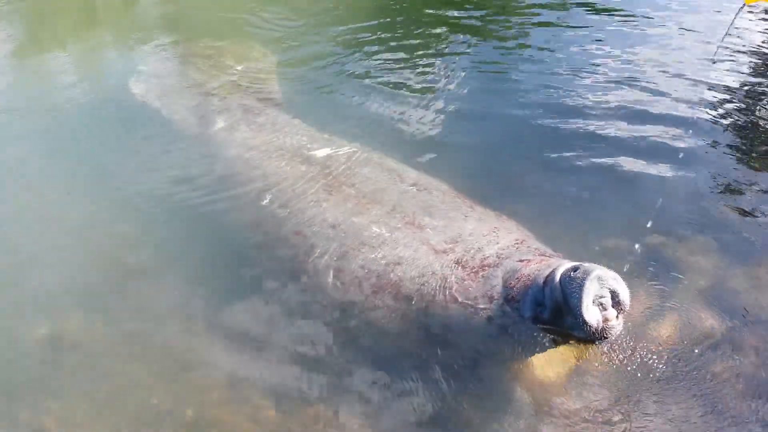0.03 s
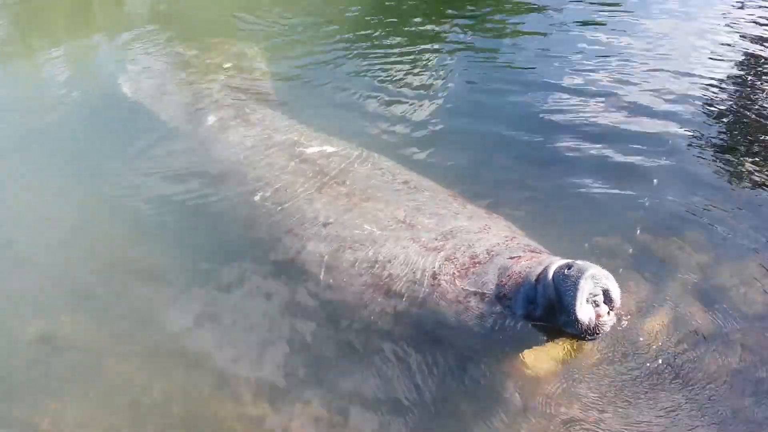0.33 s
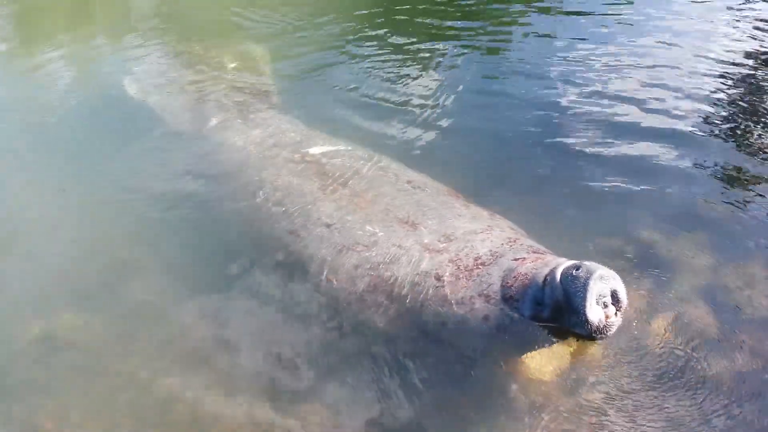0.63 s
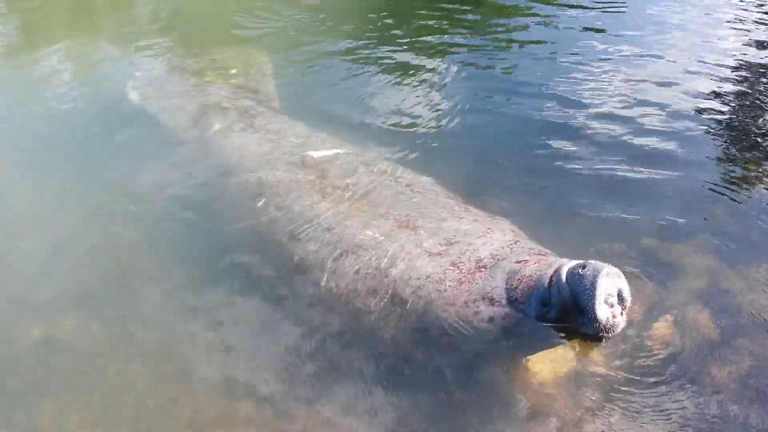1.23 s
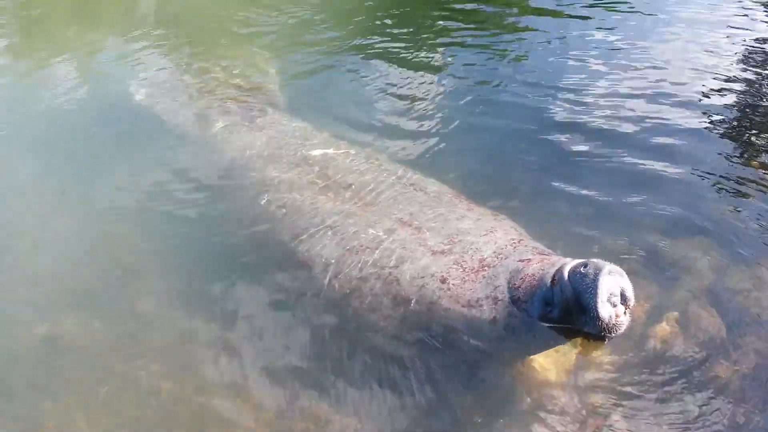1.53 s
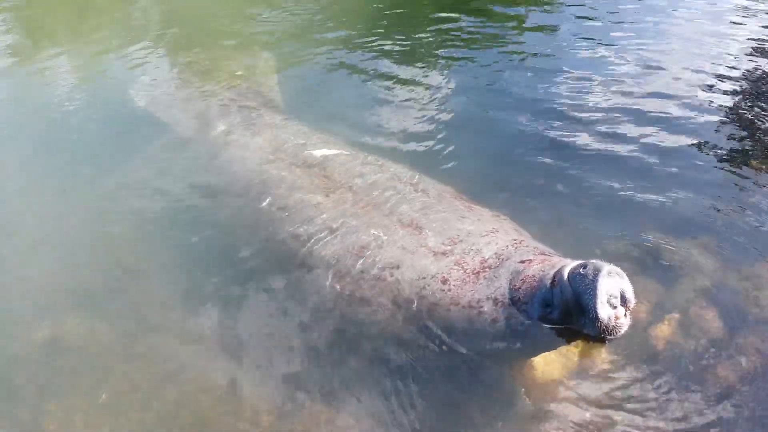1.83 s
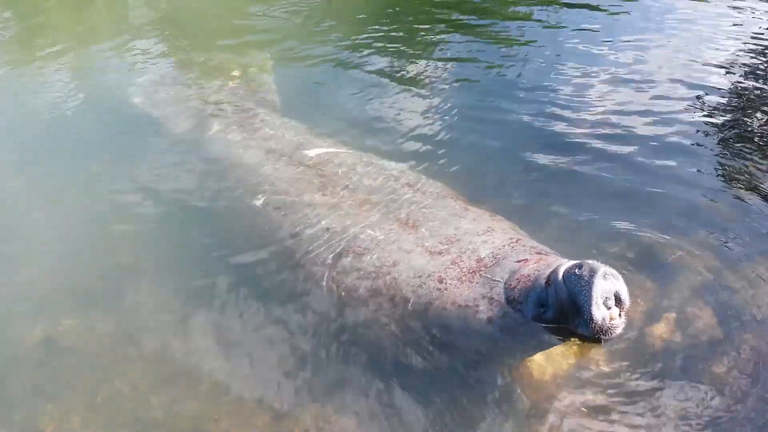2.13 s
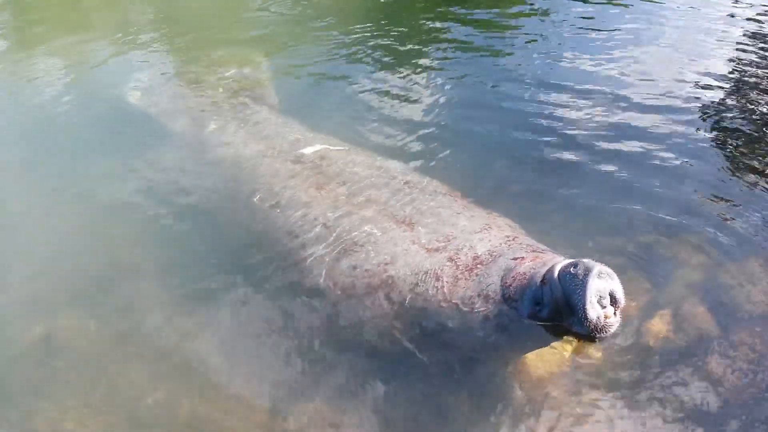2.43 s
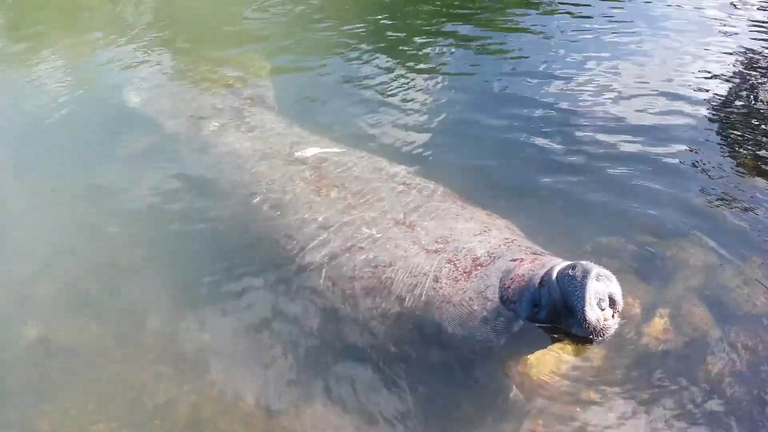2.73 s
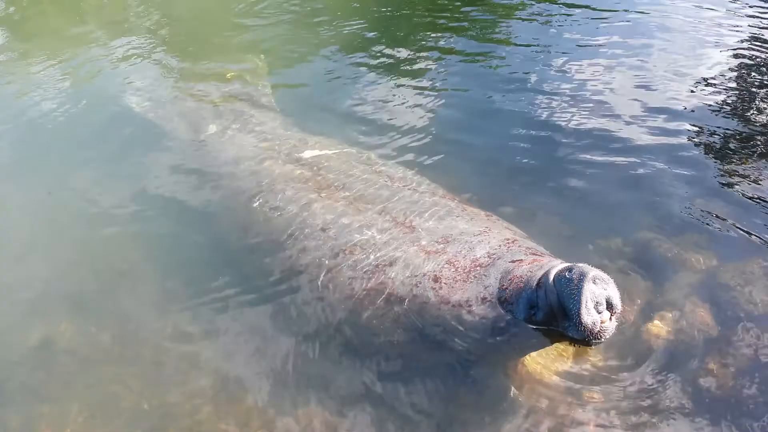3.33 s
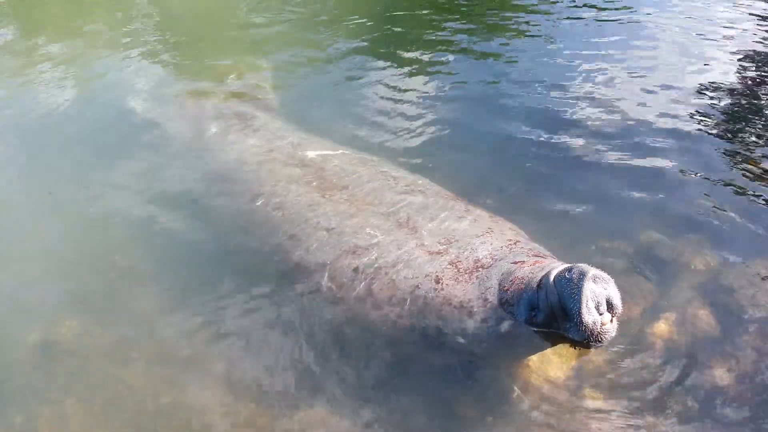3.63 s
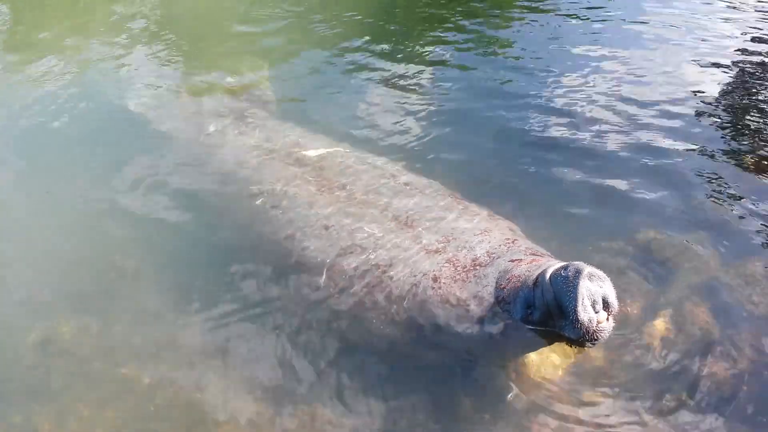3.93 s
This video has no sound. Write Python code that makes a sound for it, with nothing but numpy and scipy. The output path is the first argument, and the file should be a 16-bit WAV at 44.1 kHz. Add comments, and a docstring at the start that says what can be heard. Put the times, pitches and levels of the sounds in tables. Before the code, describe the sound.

Water drops sprinkle briefly onto calm water over a steady rumble of distant traffic.

```python
"""A thin sprinkle of water falls on a calm shallow inlet and stops after half a second.
Each drop ticks on the surface and traps a tiny ringing bubble; the stirred water laps, the bank
scatters the sound, and two stray drops follow. Far traffic rumbles throughout, with tyre roar, an
idling hum and one rising engine note, under faint hiss, a high whine and light wind."""
import sys
import numpy as np
from scipy import signal
from scipy.fft import rfft, irfft
from scipy.io import wavfile

SR = 44100
rng = np.random.default_rng(int(sys.argv[2]) if len(sys.argv) > 2 else 0)


def file_out(sig):
    """Save sig as 16-bit WAV at sys.argv[1]."""
    # one column per channel
    cols = np.atleast_2d(sig).T
    # limit, then scale
    lim = np.clip(cols, -1, 1)
    pcm = np.round(lim * 32767).astype(np.int16)
    wavfile.write(sys.argv[1], SR, pcm)


N = 176400
T = np.arange(N) / SR


def from_db(db):
    """Decibels to gain."""
    return 10 ** (np.asarray(db) / 20)


def rms_one(x):
    """Scale to unit power."""
    return x / np.sqrt(np.mean(x ** 2) + 1e-20)


def in_time(rows):
    """Each column of a time curve at every sample, end values held."""
    times_s, *columns = np.transpose(rows)
    return [np.interp(T, times_s, column) for column in columns]


def at_hz(points, hz):
    """Read a curve on a log-frequency axis."""
    points_hz, values = np.transpose(points)
    return np.interp(np.log(np.maximum(hz, 1)), np.log(np.maximum(points_hz, 1)), values)


def pan(db):
    """Stereo gains for a level difference, left minus right."""
    gains = from_db(np.array([[.5], [-.5]]) * db)
    return gains / np.sqrt(np.mean(gains ** 2, axis=0))


def drift(rate_hz):
    """Slow random motion, rms 1."""
    pole = np.exp(-80 * np.pi * rate_hz / SR)
    noise = rng.standard_normal(N // 40 + 2002)   # one value per 40 samples
    slow = signal.lfilter([1], [1, -2 * pole, pole * pole], noise)[2000:]
    return np.interp(np.arange(N) / 40, np.arange(len(slow)), rms_one(slow))


def colour(x, spectrum):
    """Filter by a smooth spectrum."""
    return irfft(rfft(x) * from_db(at_hz(spectrum, np.fft.rfftfreq(N, 1 / SR))), N)


def tone(hz):
    """Sine of rms 1 along a pitch curve."""
    return np.sqrt(2) * np.sin(2 * np.pi * np.cumsum(hz) / SR)


# Outdoor left-right likeness: f/Hz, correlation before clipping
AIR_LIKENESS = [(30, 5), (80, 2), (150, 1.5), (300, 0.7), (600, 0.83), (1000, .5), (1600, 0.24),
                (3000, 0.24), (6000, -0.08), (14000, 0)]
# Outdoor balance: f/Hz, left minus right/dB
AIR_PAN = [(60, -2), (130, -2), (290, -2), (640, -2.5), (1410, 0), (3100, 6), (6820, 0), (15000, -0.5)]
LEFT_LEAD_S = .00022


def diffuse_noise(spectrum, swell_db):
    """Outdoor stereo noise, rms 1, reaching the left first; each octave swells on its own."""
    hz = np.fft.rfftfreq(N, 1 / SR)
    mid, side = rfft(rng.standard_normal((2, N)))
    correlation = np.clip(at_hz(AIR_LIKENESS, hz), -.99, .99)
    stereo = np.sqrt(1 + correlation) * mid + np.sqrt(1 - correlation) * side * [[1], [-1]]
    stereo *= pan(at_hz(AIR_PAN, hz)) * from_db(at_hz(spectrum, hz))
    stereo[1] *= np.exp(-2j * np.pi * hz * LEFT_LEAD_S)
    octave = np.floor(np.log2(np.maximum(hz, 1)))
    bands = (irfft(stereo * (octave == k), N) for k in range(4, 15))
    return rms_one(sum(band * from_db(swell_db * drift(4.3)) for band in bands))


# Drop impacts: t/s, tick level/dB, bubble f/Hz, bubble level/dB, decay time/cycles
DROP_IMPACTS = [(.002, -26.5, 12000, -35, 5.9), (0.03, -32, 6400, -45, 3), (.076, -38, 11000, -44, 4),
                (0.096, -31, 8000, -40, 2.7), (0.0962, -25.5, 11200, -27.5, 5.3),
                (.109, -34, 13000, -36, 8), (.115, -41, 5040, -41, 5), (0.153, -43, 4180, -42, 4),
                (.157, -33, 9000, -47, 4), (0.1623, -30, 3350, -27, 3.6), (0.177, -26, 4220, -26, 3.6),
                (0.1789, -40, 2770, -31.5, 2.8), (0.199, -28, 4700, -35, 2.8), (0.209, -39, 3550, -36, 3.5),
                (.2088, -37, 12300, -39, 6), (.209, -35, 4800, -32, 3.9), (.2346, -44, 3470, -39, 2.3),
                (.266, -50, 3660, -44, 3), (.2886, -56, 4550, -39, 7.3), (0.2919, -33, 4350, -27.5, 3.5),
                (.3122, -33, 12030, -38, 9), (0.3156, -39, 5520, -32.5, 4.7), (.336, -34, 3200, -26, 0.77),
                (.3807, -34, 12900, -35, 4.4), (.4046, -29.5, 8200, -38, 3), (.4049, -37, 10800, -30, 7),
                (0.417, -28, 8140, -33, 3), (.4165, -27, 12300, -29, 4.6), (0.4197, -40, 4420, -36.5, 7.4),
                (.4494, -30, 6800, -36, 2.5), (.4495, -43, 4200, -35, 2.5), (.46, -30, 10540, -32, 3.5),
                (0.4605, -30, 4260, -37, 3.3), (.4745, -28, 12800, -38, 4), (0.477, -41, 3620, -44, 5),
                (.4955, -42, 12800, -43, 4), (1.2018, -37, 8300, -41, 2.7), (1.3767, -54, 3460, -34, 3.3),
                (1.377, -54, 1940, -44, 2.5)]
# Bubble balance: f/Hz, left minus right/dB
BUBBLE_BALANCE = [(2700, 28), (4500, 30), (7000, 18), (11000, -16), (14000, -5)]
TICK_ATTACK_S, TICK_DECAY_S, TICK_SKIRT_DB_PER_OCT = .00008, .00048, 11
SPRAY_LENGTH_S, SPRAY_DB = .0054, -12
BUBBLE_ATTACK_S, BUBBLE_RISE_PER_DECAY = .00012, .0074


def drops():
    """Each drop ticks and sprays around its bubble's pitch; the bubble rings, rising slightly."""
    size = 2048
    t = np.arange(size) / SR
    ticks, bubbles = np.zeros((2, 2, N + size))
    spray = from_db(SPRAY_DB) * np.exp(-(t / SPRAY_LENGTH_S) ** 4)
    tick_envelope = (np.exp(-t / TICK_DECAY_S) + spray) * (1 - np.exp(-t / TICK_ATTACK_S))
    bubble_attack = 1 - np.exp(-t / BUBBLE_ATTACK_S)
    band_hz = np.maximum(np.fft.rfftfreq(2 * size, 1 / SR), 1)
    for start_s, tick_db, bubble_hz, bubble_db, decay_cycles in DROP_IMPACTS:
        i = int(start_s * SR)
        burst = tick_envelope * rng.choice([-1, 1], (2, size))
        band_gain = from_db(tick_db - TICK_SKIRT_DB_PER_OCT * np.abs(np.log2(band_hz / bubble_hz)))
        ticks[:, i:i + size] += irfft(rfft(burst, 2 * size) * band_gain)[:, :size]
        decays = t * bubble_hz / decay_cycles
        rising_hz = bubble_hz * (1 + BUBBLE_RISE_PER_DECAY * decays)
        ring = np.sin(2 * np.pi * np.cumsum(rising_hz) / SR) * np.exp(-decays) * bubble_attack
        bubbles[:, i:i + size] += from_db(bubble_db) * ring * pan(at_hz(BUBBLE_BALANCE, bubble_hz))
    return ticks[:, :N], bubbles[:, :N]


# Sprinkle flow: t/s, relative level/dB
SPRINKLE_FLOW = [(0, -3.5), (.2, 1), (.27, -5), (.46, 0.5), (.56, -14), (.75, -69)]
MIST_PER_S, MIST_DB, MIST_SPREAD_DB = 1400, -53.5, 4


def mist():
    """Tiny droplets patter at random while the sprinkle lasts."""
    flow_db, = in_time(SPRINKLE_FLOW)
    sizes = from_db(MIST_SPREAD_DB * np.minimum(rng.exponential(1, N), 4))
    hits = sizes * (rng.random(N) < MIST_PER_S / SR)
    power = signal.fftconvolve(hits ** 2, np.exp(-2 * T[:256] / TICK_DECAY_S))[:N]
    patter = rng.standard_normal((2, N)) * np.sqrt(np.abs(power))
    return from_db(MIST_DB + flow_db) * patter


def bank_scatter(direct, level_db=-7.5, decay_s=.0049):
    """Short diffuse echo off the nearby bank."""
    t = T[:8192]
    tail = rng.standard_normal((2, len(t))) * np.exp(-t / decay_s)
    tail /= np.sqrt(np.sum(tail ** 2, axis=1, keepdims=True))
    return from_db(level_db) * signal.fftconvolve(direct, tail, axes=1)[:, :N]


# Tick and mist colour on each side: f/Hz, gain/dB
TICK_EQ_LEFT = [(1500, -26), (3000, -1), (5000, 2.5), (8000, -7), (11000, -7), (15000, -8)]
TICK_EQ_RIGHT = [(1500, -14), (3000, -3), (5000, -9), (8000, -6), (11000, 1), (15000, -5.5)]


def sprinkle():
    """Ticks, mist and bubbles arrive directly and off the bank."""
    ticks, bubbles = drops()
    left, right = ticks + mist()
    direct = bubbles + np.array([colour(left, TICK_EQ_LEFT), colour(right, TICK_EQ_RIGHT)])
    return direct + bank_scatter(direct)


# Lapping envelope: t/s, level/dB
LAP_LEVEL = [(0, -73), (.065, -48), (.12, -60), (.21, -55.5), (.29, -65.5), (.36, -54), (.5, -77),
             (.8, -80)]
# Hollow water resonance: f/Hz, relative level/dB
LAP_SPECTRUM = [(250, -43), (450, -26), (520, 8), (610, 8.5), (720, -21), (1400, -45)]


def lapping():
    """The stirred water laps hollowly while the sprinkle lasts."""
    level_db, = in_time(LAP_LEVEL)
    return from_db(level_db) * diffuse_noise(LAP_SPECTRUM, swell_db=2.5)


# Traffic swell: t/s, relative level/dB
TRAFFIC_SWELL = [(0, -48.5), (.4, -48), (1.0, -50.5), (1.6, -50), (2.2, -49.5), (2.8, -49), (3.3, -48),
                 (3.7, -48), (4, -48.5)]
# Road rumble: f/Hz, relative level/dB
RUMBLE_SPECTRUM = [(20, -22), (32, -25), (47, -3.5), (58, -8), (90, 0), (124, -1), (162, -8), (240, -7.5),
                   (320, -12), (400, -16.5), (530, -13), (720, -18), (950, -17.5), (1150, -21), (1600, -26),
                   (2500, -35.5), (3300, -51.5)]


def road_rumble(gain_db=4.5):
    """Far traffic merges into a low, gently swelling noise."""
    swell_db, = in_time(TRAFFIC_SWELL)
    return from_db(gain_db + swell_db) * diffuse_noise(RUMBLE_SPECTRUM, swell_db=.11)


# Tyre envelope: t/s, level/dB
TYRE_LEVEL = [(0, -60), (1.7, -65), (2.6, -57.5), (3.3, -54), (4, -53)]
# Tyre noise: f/Hz, relative level/dB
TYRE_SPECTRUM = [(200, -28), (450, 1.5), (650, 2.5), (1000, 4), (1170, -23), (2000, -46)]


def tyre_roar():
    """The tyres of an approaching car grow louder in the second half."""
    level_db, = in_time(TYRE_LEVEL)
    return from_db(level_db) * diffuse_noise(TYRE_SPECTRUM, swell_db=.11)


HUM_HZ, HUM_WANDER_HZ, HUM_DB, HUM_WAVER = 65.6, 3.19, -53, .32
MOTOR_PAN_DB = at_hz(AIR_PAN, HUM_HZ)


def idling_motor():
    """An idling motor hums, unsteady in pitch and strength."""
    hum = tone(HUM_HZ + HUM_WANDER_HZ * drift(3.13))
    waver = 1 + HUM_WAVER * drift(5.5)
    return from_db(HUM_DB) * waver * hum * pan(MOTOR_PAN_DB)


# Background hiss: f/Hz, relative level/dB
HISS_SPECTRUM = [(1200, -6), (2500, 2.5), (3300, 3), (4300, 1.5), (5500, -2), (7000, -3), (9800, -3),
                 (11000, -3.5), (13000, -2), (15000, -11)]


def hiss(mean_db=-59.5, swell_share=.61):
    """Faint hiss follows part of the traffic's swell."""
    traffic_db, = in_time(TRAFFIC_SWELL)
    level_db = mean_db + swell_share * (traffic_db - traffic_db.mean())
    return from_db(level_db) * diffuse_noise(HISS_SPECTRUM, swell_db=.55)


# Whine envelope: t/s, level/dB
WHINE_LEVEL = [(0, -77), (.3, -67), (.45, -69), (.52, -75), (.58, -66.5), (.77, -68), (.81, -78.5),
               (1.15, -73.5), (1.28, -80), (1.4, -69), (1.75, -76), (2.0, -78), (2.15, -74.5), (2.35, -77),
               (2.8, -80), (2.98, -70), (3.3, -71.5), (3.52, -71), (3.66, -67.5), (3.82, -69), (3.98, -81)]


def whine(pitch_hz=2687, wander_hz=1.64):
    """A thin, nearly steady tone fades in and out on the left."""
    level_db, = in_time(WHINE_LEVEL)
    return from_db(level_db) * tone(pitch_hz + wander_hz * drift(6.8)) * pan(db=7)


# Wind puffs: peak t/s, Gaussian sigma/s, level/dB, tilt/(dB/octave)
WIND_PUFFS = [(.188, 0.055, -41.5, -2), (0.385, 0.0099, -34.5, 0), (.485, 0.048, -48, 0),
              (0.665, 0.012, -41, -2), (.716, 0.012, -37.5, -1), (1.963, 0.023, -45.5, 1.5),
              (3.87, .025, -43, 2.5), (3.938, 0.019, -36, 2.5), (3.99, 0.023, -39, 0.5)]
# Wind noise: f/Hz, relative level/dB
WIND_SPECTRUM = [(15, -27), (30, -5), (60, -1.5), (100, -4.5), (170, -6), (300, -21), (700, -26),
                 (2000, -66)]
BREEZE_DB, BREEZE_SWING_DB = -59, 6.5


def wind():
    """A light breeze and soft low puffs, with separate eddies on each side of the microphone."""
    eddies = rng.standard_normal((2, N))
    breeze_gain = from_db(BREEZE_DB + BREEZE_SWING_DB * drift(1.4))
    airflow = breeze_gain * rms_one(colour(rng.standard_normal((2, N)), WIND_SPECTRUM))
    for peak_s, sigma_s, level_db, tilt_db_per_oct in WIND_PUFFS:
        tilted = [(hz, db + tilt_db_per_oct * np.log2(hz)) for hz, db in WIND_SPECTRUM]
        envelope = from_db(level_db) * np.exp(-.5 * ((T - peak_s) / sigma_s) ** 2)
        airflow += envelope * rms_one(colour(eddies, tilted))
    return airflow * pan(db=-7)


# Engine run-up: t/s, firing f/Hz, level/dB
ENGINE_RUN_UP = [(1.6, 104, -60), (1.95, 112.3, -53), (2.25, 117.2, -52.5), (2.45, 127, -48),
                 (2.62, 131, -46.5), (2.8, 134, -62), (3.25, 137.8, -58.5), (3.5, 141.4, -50),
                 (3.75, 143, -58)]


def rising_engine(wander_hz=2.5, waver=.17, octave_db=-12.5):
    """An engine gathers speed: its firing note and second harmonic climb, uneven in strength."""
    firing_hz, level_db = in_time(ENGINE_RUN_UP)
    firing_hz += wander_hz * drift(12.2)
    envelope = from_db(level_db) * (1 + waver * drift(20))
    note = tone(firing_hz) + from_db(octave_db) * tone(2 * firing_hz)
    return envelope * note * pan(MOTOR_PAN_DB)


def scene():
    """The sprinkle over the outdoor background."""
    water = sprinkle()
    traffic = idling_motor() + rising_engine() + road_rumble() + tyre_roar()
    return water + traffic + wind() + whine() + hiss() + lapping()


def record(dry):
    """A steep low-pass cuts the highest treble."""
    cutoff_hz = 14800
    return signal.sosfilt(signal.ellip(12, .1, 70, cutoff_hz, fs=SR, output="sos"), dry)


dry = scene()
out = record(dry)
file_out(out)
```